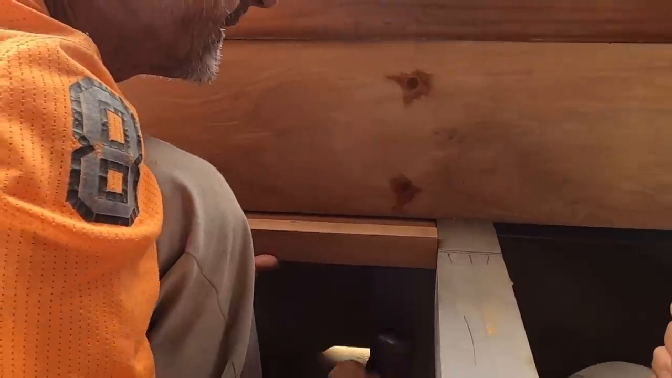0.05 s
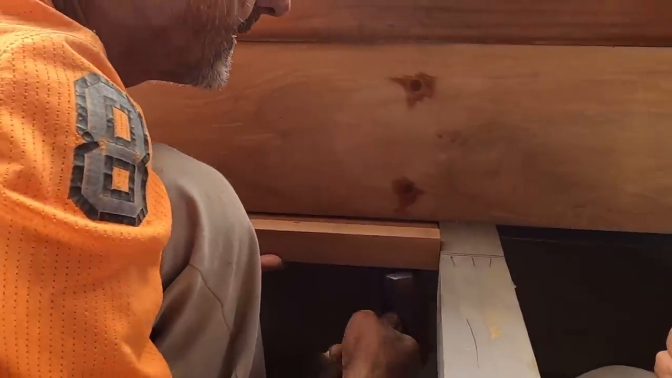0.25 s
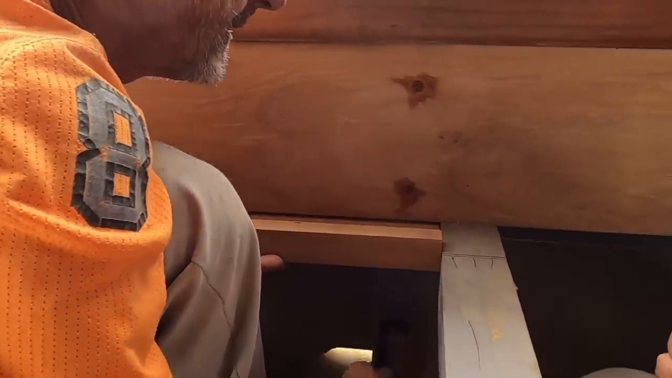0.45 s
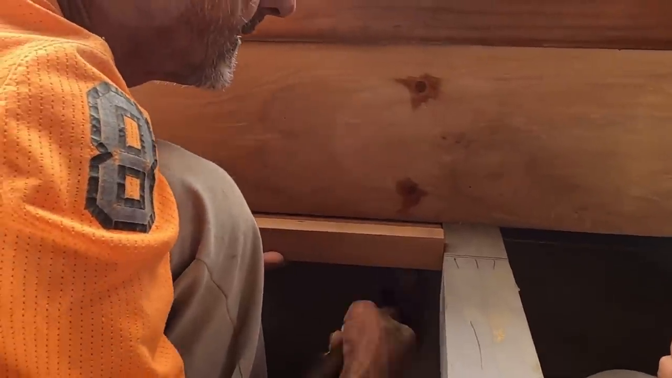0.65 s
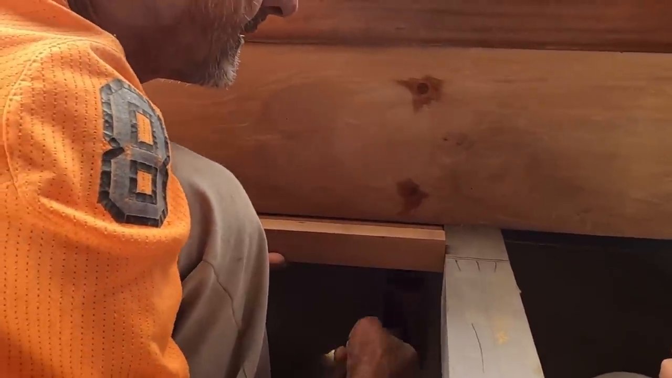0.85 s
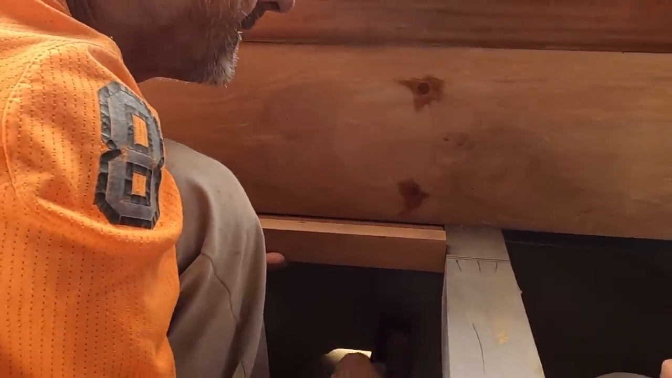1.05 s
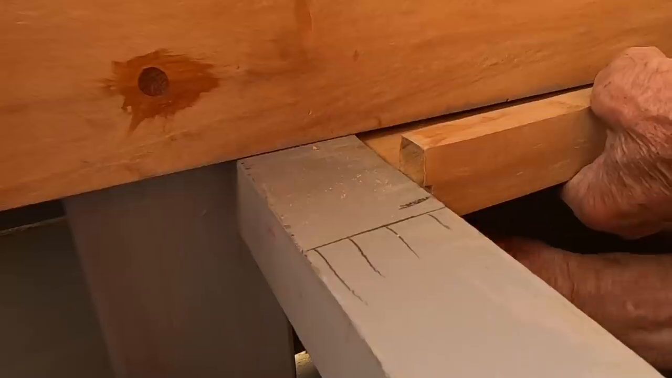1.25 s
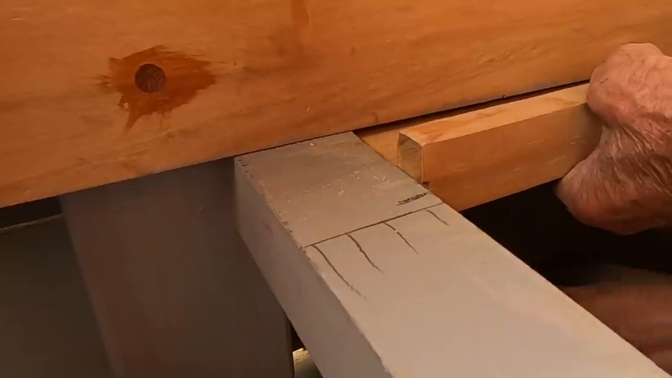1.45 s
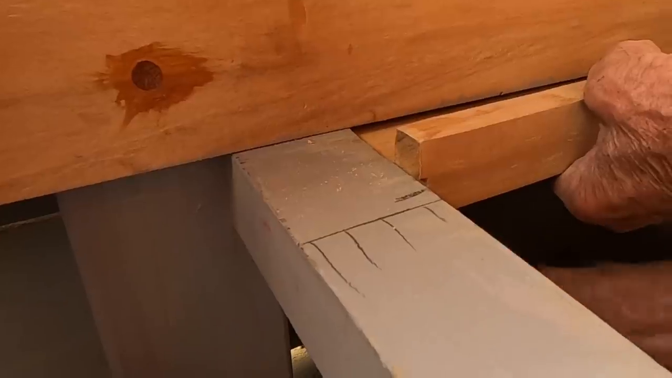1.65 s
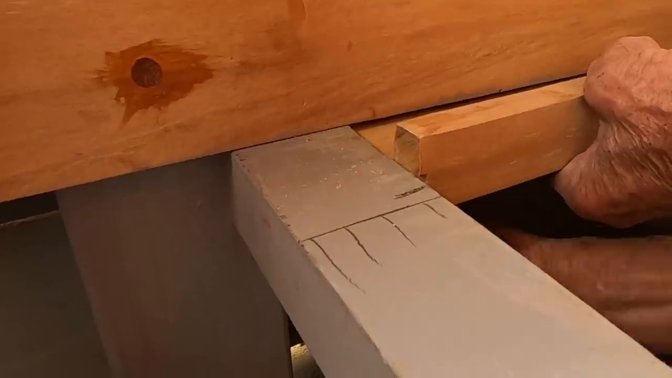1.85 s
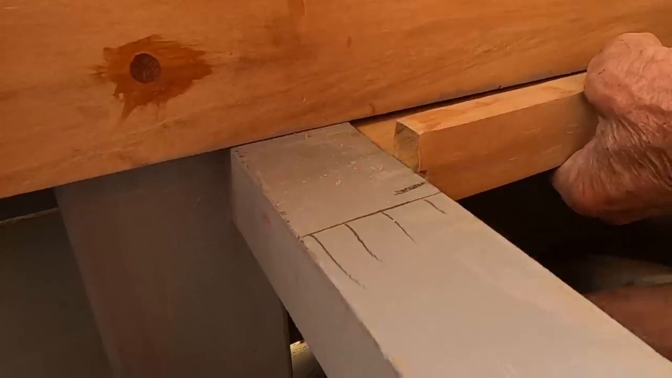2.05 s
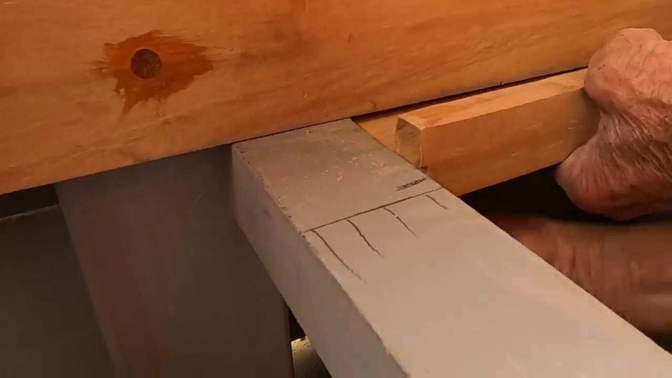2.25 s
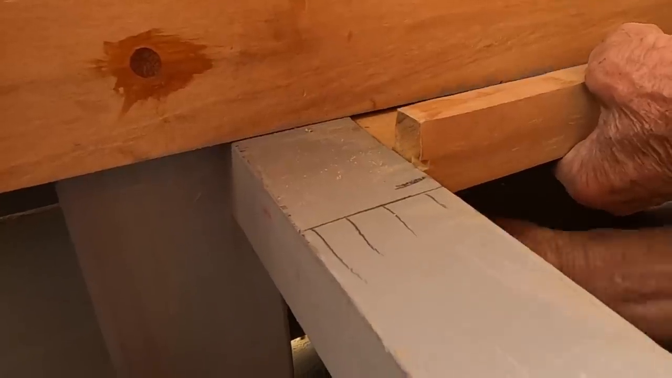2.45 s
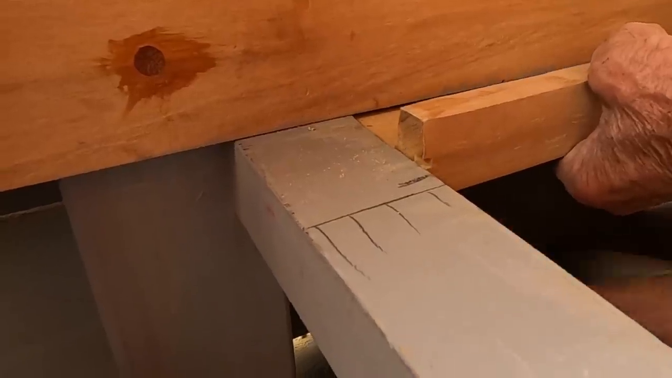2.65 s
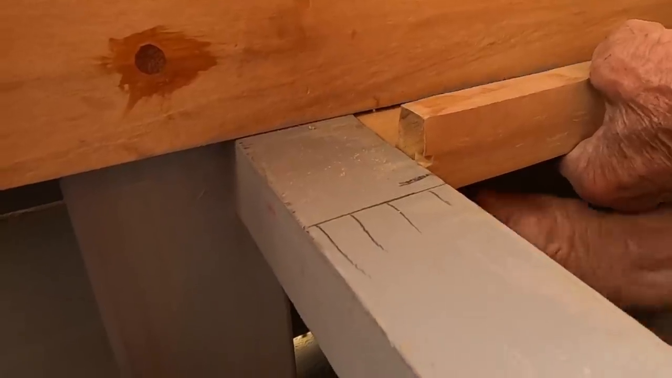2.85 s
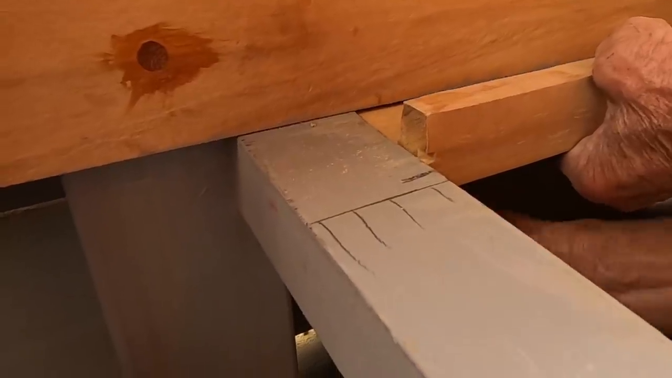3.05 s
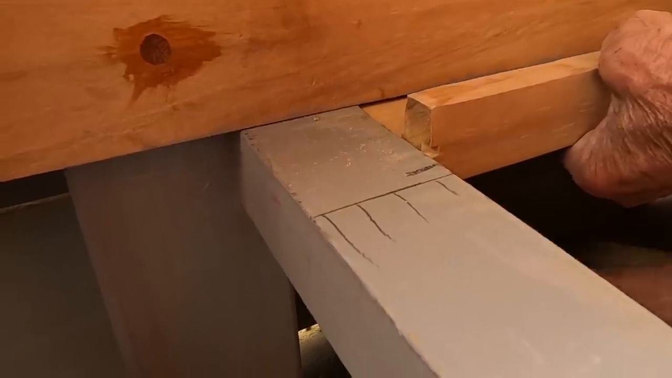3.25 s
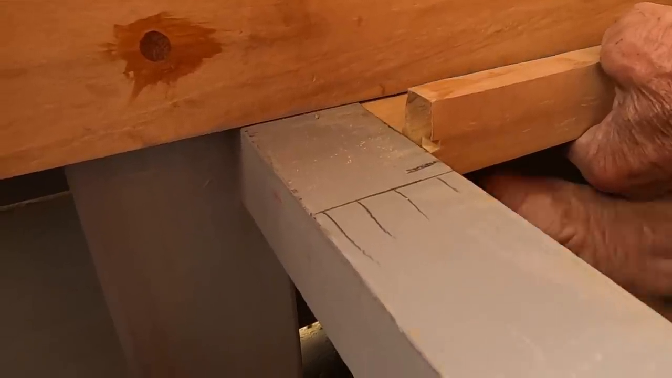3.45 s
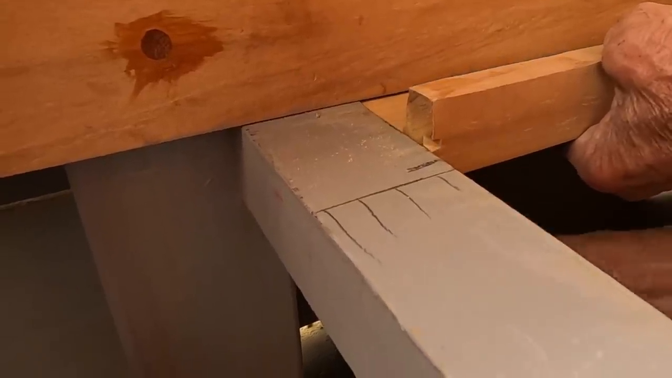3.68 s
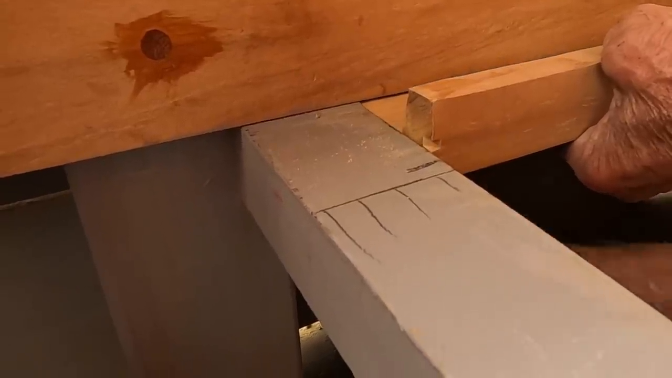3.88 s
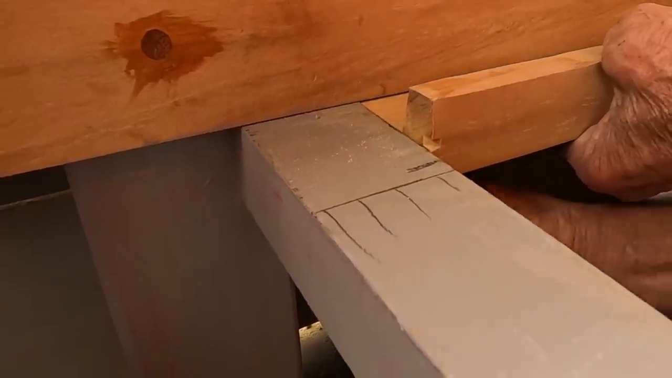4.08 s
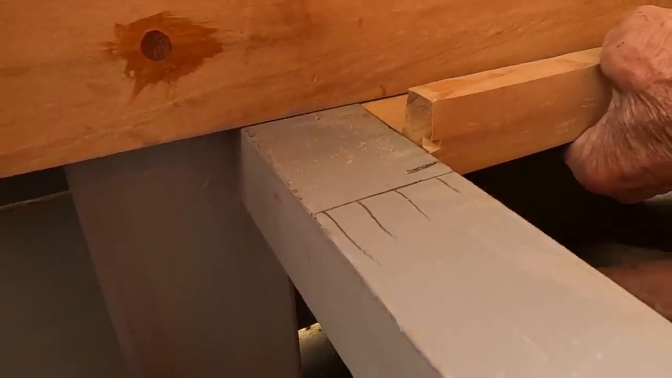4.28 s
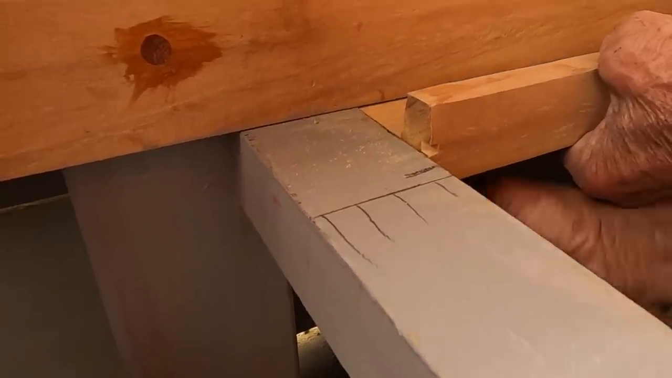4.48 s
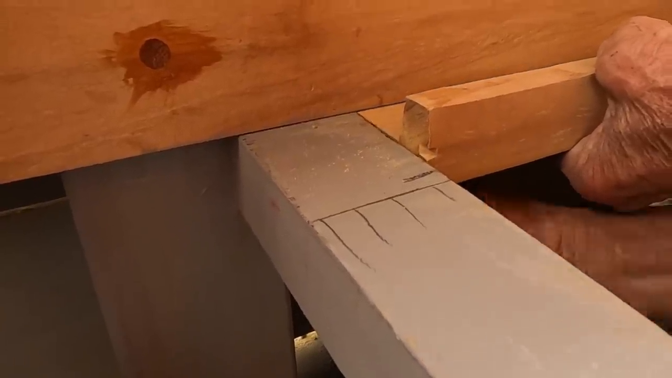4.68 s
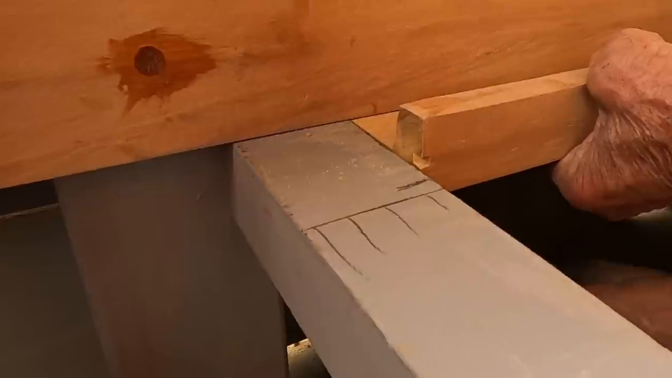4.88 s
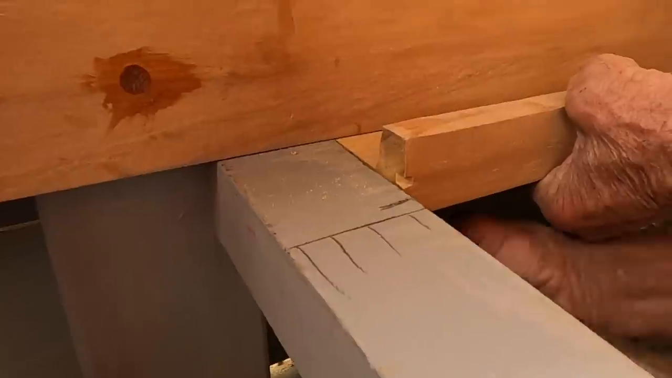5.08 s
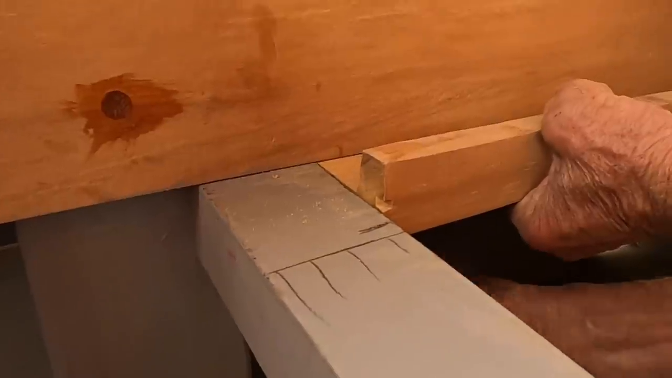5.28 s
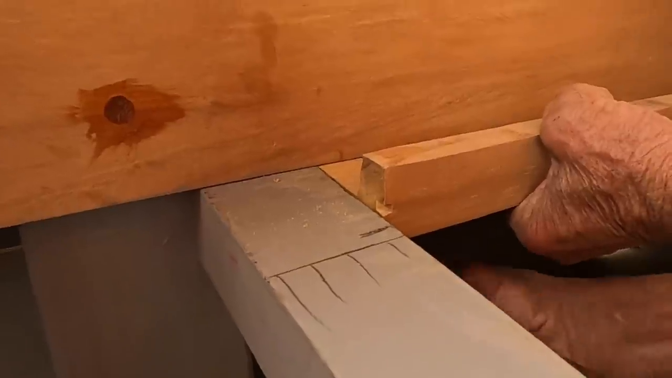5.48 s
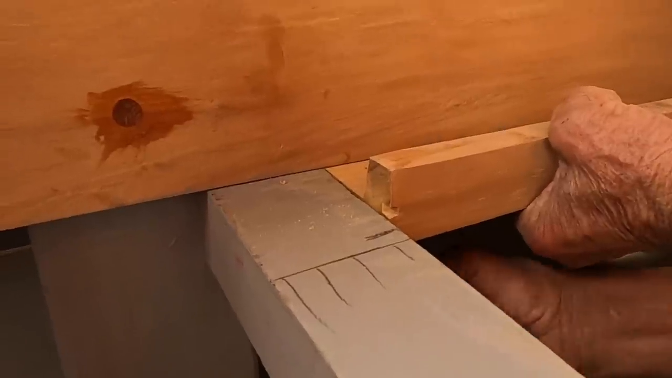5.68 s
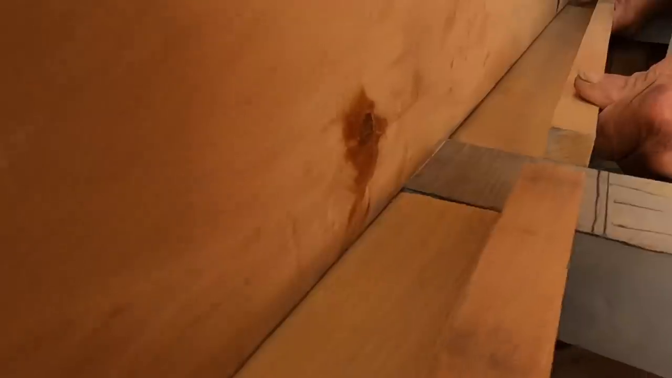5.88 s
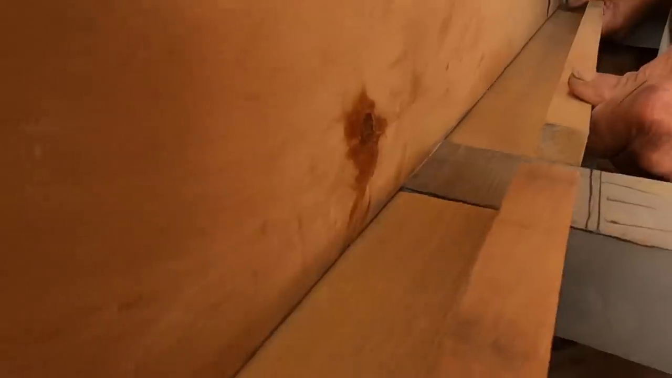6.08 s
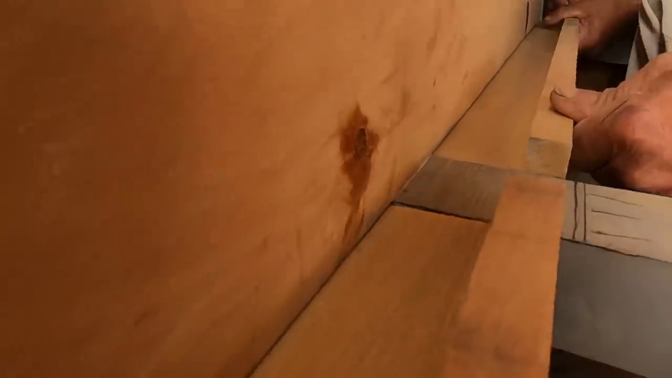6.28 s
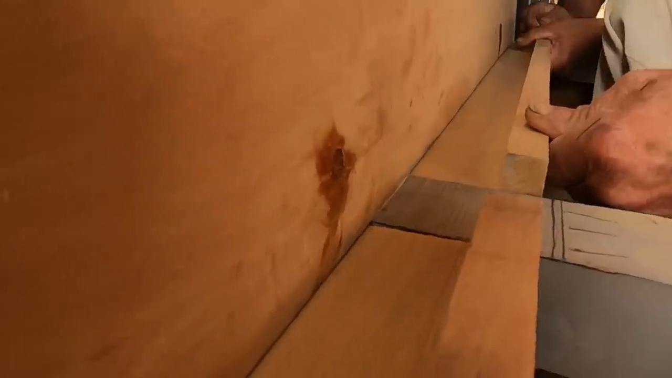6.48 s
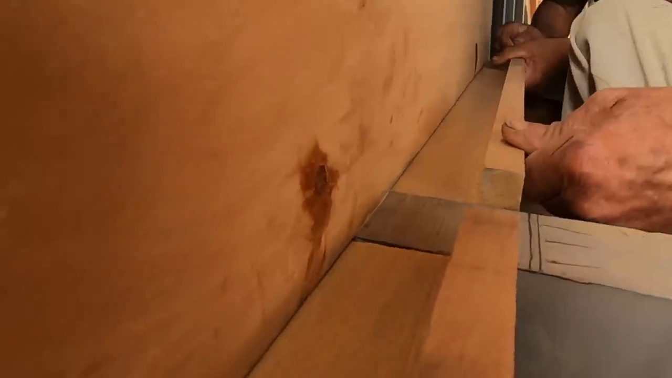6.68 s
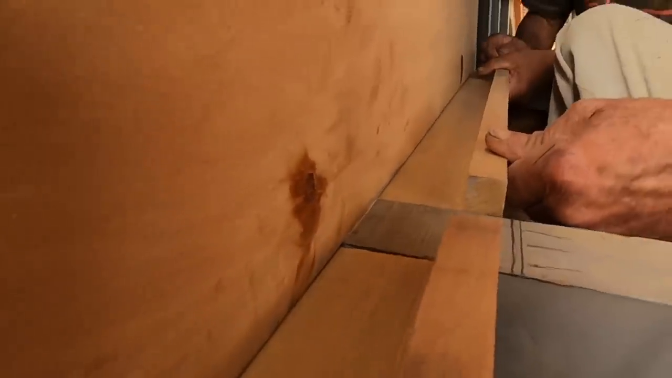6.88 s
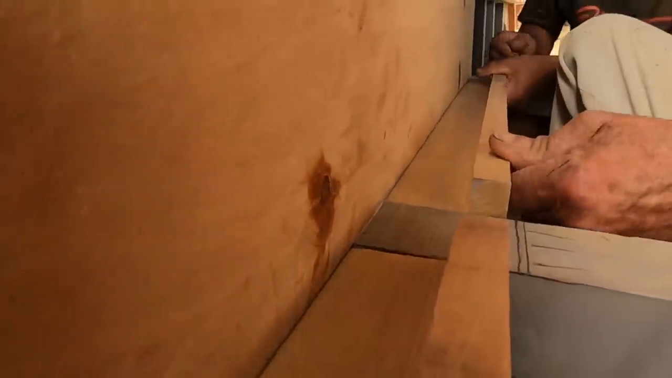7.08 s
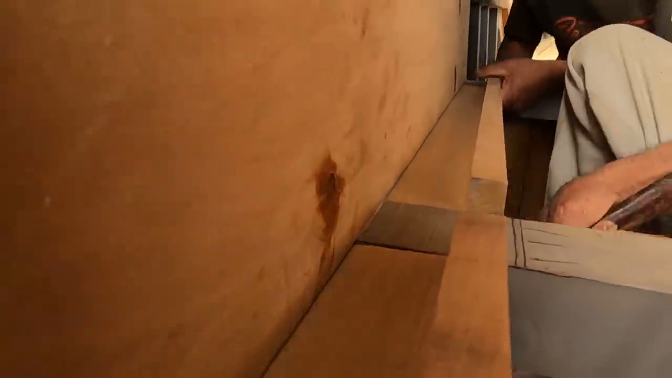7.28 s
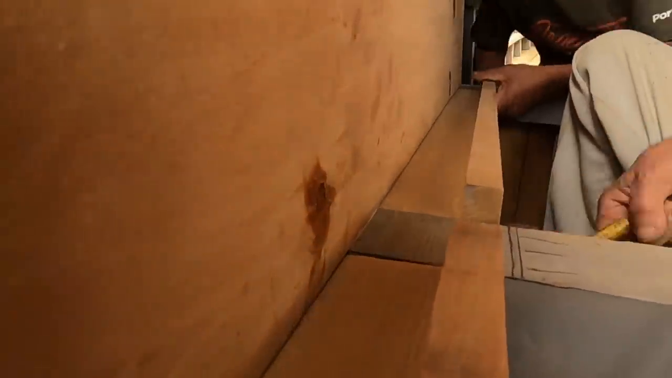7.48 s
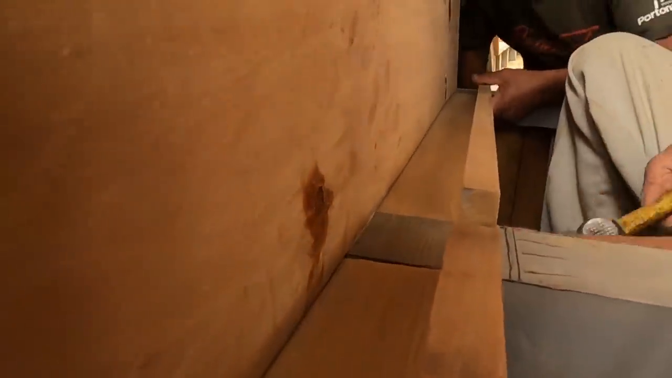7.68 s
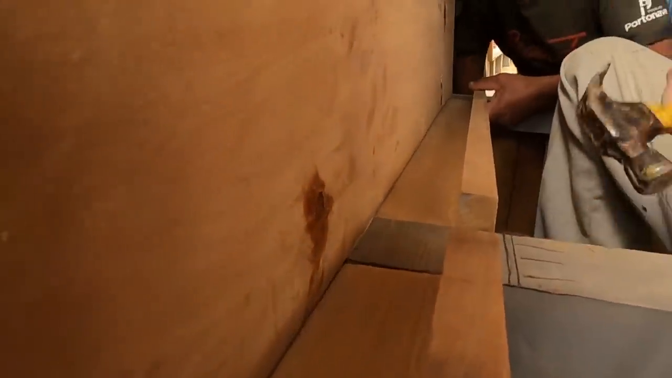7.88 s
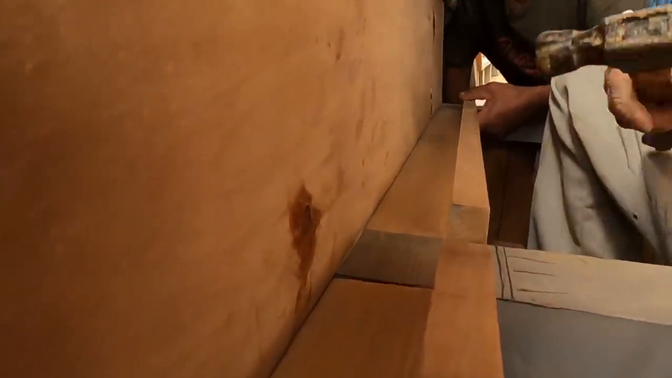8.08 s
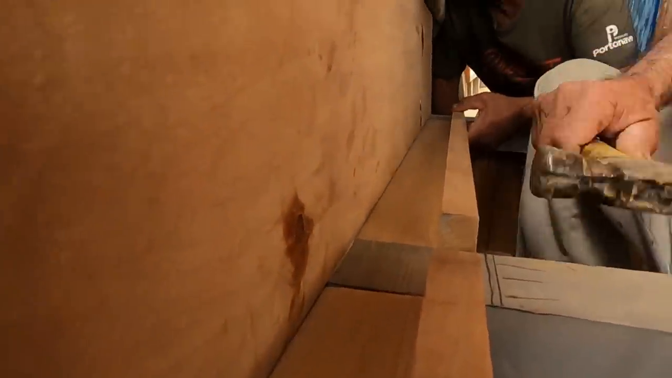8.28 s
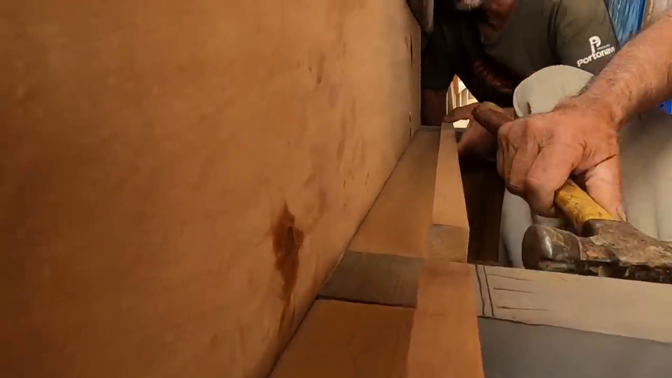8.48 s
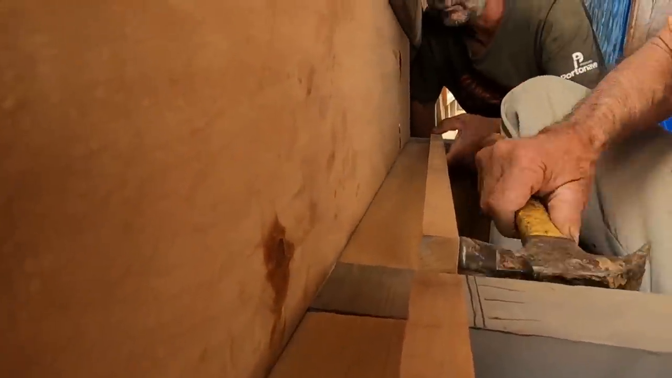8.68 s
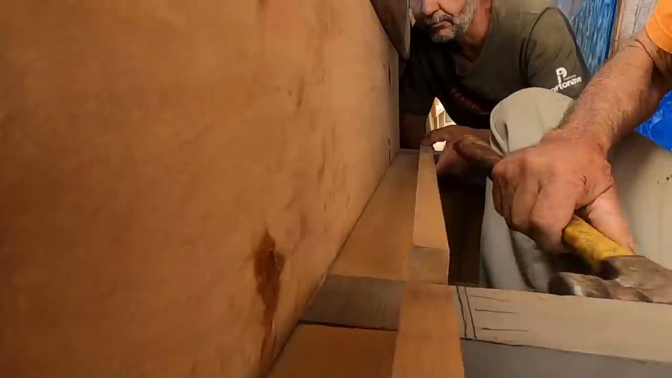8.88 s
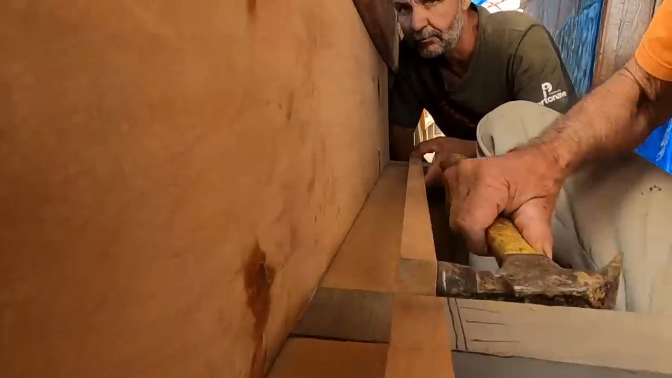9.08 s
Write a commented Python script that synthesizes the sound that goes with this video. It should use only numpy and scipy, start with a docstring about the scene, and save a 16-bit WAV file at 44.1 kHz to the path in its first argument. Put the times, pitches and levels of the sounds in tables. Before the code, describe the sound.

Close up in a boat workshop, a hammer strikes a wooden batten roughly every half second, each blow a sharp crack with a hollow knock and short hull boom. The first few are brighter with deep rumble after them; the next are duller and mono. Then come faint quickening taps, a near pause and one final soft knock over low rumble and hiss.

```python
"""In a boat workshop a claw hammer drives a batten home on the planking: eleven hard blows, then lighter taps.
Each contact is a crack of shaped noise at the steel face, a noise burst for the batten and sine modes for the hull;
a bright click, bounces of the head and small knocks fall between. Behind it lie filtered-noise rumble and hiss,
a thin sine whine, a squeak and a scuff.
It is heard close by from three places in turn, each with its own air and its own balance of the timber."""
import sys
import numpy as np
from scipy import signal
from scipy.fft import rfft, irfft, next_fast_len
from scipy.io import wavfile
from scipy.ndimage import uniform_filter1d, minimum_filter1d

SR = 44100
rng = np.random.default_rng(int(sys.argv[2]) if len(sys.argv) > 2 else 0)


def persist_wave(psi):
    """Save psi, clipped to +-1, as 16-bit WAV."""
    counts = np.round(np.clip(psi, -1, 1) * 32767).astype(np.int16)
    wavfile.write(sys.argv[1], SR, np.atleast_2d(counts).T)


N = 403065
TIME = np.arange(N) / SR  # s, along the whole scene
RING = 32768  # samples in one struck sound
AGE = np.arange(RING) / SR  # s since the start of a struck sound


def undb(db):
    """Decibels to gain."""
    return 10 ** (np.asarray(db) / 20)


def unit(x):
    """Scale to rms 1."""
    return x / np.sqrt(np.mean(x ** 2))


def read(table, hz):
    """Value of a (Hz, value) table on a log-frequency axis."""
    table_hz, value = np.transpose(table)
    return np.interp(np.log(hz + 1), np.log(table_hz), value)


def freqs(size):
    """Frequencies of a real spectrum."""
    return np.arange(size // 2 + 1) * SR / size


def colour(x, db):
    """Minimum-phase filter: the relative gain at each frequency is given and the energy stays the same."""
    size = x.shape[-1]
    # folding the cepstrum forward keeps the attack sharp
    cepstrum = irfft(np.log(undb(db)), size)
    cepstrum[1:size // 2] *= 2
    cepstrum[size // 2 + 1:] = 0
    filtered = irfft(rfft(x) * np.exp(rfft(cepstrum)), size)
    return unit(filtered) * np.sqrt(np.mean(x ** 2))


def pair(mid, side):
    """Left and right from mid and side."""
    return np.array([mid + side, mid - side])


def noise(size, side_db):
    """White stereo noise; the side level sets its width."""
    return pair(rng.standard_normal(size), undb(side_db) * rng.standard_normal(size))


def fade(t60, hold=0):
    """Exponential decay that starts gently, staying nearly level for about `hold` s."""
    held_age = np.hypot(AGE, hold) - abs(hold)
    return np.exp(-np.log(1000) * held_age / t60)


def add(out, s, sound):
    """Mix a sound in at time s."""
    start = max(int(s * SR), 0)
    out[:, start:start + sound.shape[-1]] += sound[:, :N - start]


def bump(hz, centre_hz, octaves, db):
    """A hump in dB around one frequency."""
    return db / (1 + (np.log2((hz + 1) / centre_hz) / octaves) ** 2)


def uneven(size, db, spacing_hz=110):
    """Random peaks and dips in dB across a spectrum."""
    return db * np.interp(freqs(size) / spacing_hz, np.arange(1024), rng.standard_normal(1024))


def walk(rate):
    """Smooth random wandering about zero, `rate` steps per second, spread about a third."""
    k = int(SR / rate)
    steps = np.repeat(rng.standard_normal(N // k + 1), k)
    return 0.4 * uniform_filter1d(steps, k)[:N]


# Moves to the second and third listening place, in seconds.
MOVES = (1.3, 5.927)


def places():
    """Shares of the first, second and third listening place over time, each crossfaded just before the move."""
    second, third = (np.clip((TIME - s) / fade_s + 1, 0, 1) for s, fade_s in zip(MOVES, (.1, .004)))
    return 1 - second, second - third, third


def air(spectrum, db, side_db, waver_db=2.0, ripple_db=2.37):
    """Workshop rumble and hiss as shaped noise; the bass is alike in both ears, the treble wider."""
    size = next_fast_len(N)
    f = freqs(size)
    shape = unit(undb(read(spectrum, f) + uneven(size, ripple_db)))
    width = undb(side_db) * (0.033 + f / (f + 4000))
    mid, side = (irfft(rfft(rng.standard_normal(size)) * gain, size)[:N] for gain in (shape, shape * width))
    return pair(mid, side) * undb(db + waver_db * walk(6.4))


def whine(hz=506.0, waver=0.0099):
    """A distant motor whines faintly: a wavering sine and its octave."""
    angle = 2 * np.pi * np.cumsum(hz * (1 + waver * walk(30))) / SR
    return undb(-61.0) * np.sin(angle) + undb(-62) * np.sin(2 * angle)


# Tone of the air at the third place. Each row: frequency in Hz, relative density in dB per Hz.
AIR_THIRD = [(25, -9.5), (55, -11), (84, 3.5), (115, -11.5), (200, -14.5), (260, -22), (410, -19),
             (550, -28), (950, -27.5), (1500, -36), (4000, -49), (5300, -47), (7500, -61.5), (15000, -97)]
# Swell of that air. Each row: time in seconds, level in dB before the air's own trim and waver.
THIRD_LEVEL = [(5.9, -46.5), (6.6, -44), (7.35, -48), (7.7, -42.5), (8.3, -40), (8.7, -35), (8.95, -47),
               (9.14, -40)]
SWELL_TOP_HZ = 900  # the air swells mostly below this
HISS_DB, HISS_SWELL_SHARE = -45.5, 0.76  # pivot level of the hiss, and how far it follows the swell


def swelling_air():
    """At the third place the rumble swells and sinks; the hiss above it follows only in part."""
    rumble_db = np.interp(TIME, *np.transpose(THIRD_LEVEL))
    hiss_db = HISS_DB + HISS_SWELL_SHARE * (rumble_db - HISS_DB)
    whole = air(AIR_THIRD, db=-0.5, side_db=4.0, waver_db=3.5)
    low_pass = signal.butter(2, SWELL_TOP_HZ, fs=SR, output="sos")
    rumble = signal.sosfiltfilt(low_pass, whole)
    hiss = whole - rumble
    return rumble * undb(rumble_db) + hiss * undb(hiss_db)


# Tone of the air at the first and second place. Each row: frequency in Hz, relative density in dB per Hz.
AIR_FIRST = [(25, -2), (95, -2), (140, -14.5), (195, -8.5), (380, -22.5), (700, -31.5), (1100, -25),
             (2400, -25), (5800, -30), (7700, -33), (9000, -49.5), (12500, -58), (15000, -69)]
AIR_SECOND = [(25, -5), (55, 4), (110, 1), (195, -5), (330, -14.5), (520, -18.5), (750, -25.5), (1020, -21),
              (2500, -19), (4200, -25), (6000, -31.5), (7700, -33), (10000, -41.5), (15000, -42.5)]


def workshop():
    """Background bed: each listening place has its own air, and the second also has the motor."""
    first, second, third = places()
    first_air = air(AIR_FIRST, db=-41, side_db=4)
    second_air = air(AIR_SECOND, db=-41.5, side_db=-26.5) + whine()
    return first_air * first + second_air * second + swelling_air() * third


def squeak(s=8.2, length=0.12, hz=620., glide=0.015, db=-45):
    """A faint, short, slightly rising squeak: one gliding sine."""
    out = np.zeros((2, N))
    part = np.minimum(AGE / length, 1)
    angle = 2 * np.pi * np.cumsum(hz * (1 + glide * (2 * part - 1))) / SR
    add(out, s, undb(db) * np.sin(np.pi * part) * np.sin(angle)[None])
    return out


def rub(s, length, hz, width_hz, db):
    """A soft swell of friction: noise in one resonance."""
    out = np.zeros((2, N))
    shape = -20 * np.log10(1 + ((freqs(RING) - hz) / width_hz) ** 2)
    swell = np.sin(np.pi * np.minimum(AGE / length, 1))
    add(out, s, undb(db) * colour(noise(RING, side_db=-7.5), shape) * swell)
    return out


# Sharp resonances of batten and hammer head. Each row: centre in Hz, width in Hz, lift in dB.
RINGS = [(1083, 23, 6.5), (1542, 47, 2.5), (1880, 19, 5), (2490, 140, 3.5), (2635, 45, 3), (3230, 41, 2),
         (3300, 70, 0.5), (3950, 110, 2.5), (4780, 66, -3), (4900, 94, 2.5), (5900, 22, 1)]


def rings(hz):
    """Lift or dip in dB from the sharp resonances."""
    return sum(db / (1 + (2 * (hz - centre) / width) ** 2) for centre, width, db in RINGS)


# Tone of the rush before a blow. Each row: frequency in Hz, relative level in dB.
RUSH_COLOUR = [(100, -16.5), (600, 1), (2200, 1), (4000, 1), (5500, -6), (7500, -10.5), (10000, -33.5),
               (15000, -54)]
RUSH_DB, RUSH_RISE_S = -5, 0.0084  # level against the blow's crack level, rise time constant


def rushes(blows, size=2048, ripple_db=4.5):
    """A few hundredths of a second of gritty hiss swell up to each blow, each with its own uneven colour."""
    out = np.zeros((2, N))
    f = freqs(size)
    rise = np.exp(-AGE[:size][::-1] / RUSH_RISE_S)
    for s, _, _, crack_db, *_ in blows:
        tone = read(RUSH_COLOUR, f) + rings(f) + uneven(size, ripple_db)
        hiss = colour(noise(size, side_db=-25.5), tone)
        add(out, s - size / SR, undb(crack_db + RUSH_DB) * hiss * rise)
    return out


def shudder(strikes, hz=50, db=-29, t60=0.67):
    """A deep rumble follows each strike: decaying noise humped around a low pitch."""
    out = np.zeros((2, N))
    shape = bump(freqs(RING), hz, octaves=2.0, db=66.5)
    envelope = fade(t60) * (1 - np.exp(-AGE / .005))
    for s, *_ in strikes:
        add(out, s, undb(db) * colour(noise(RING, side_db=-17.5), shape) * envelope)
    return out


# Ring of the dense wood and the workshop. Each row: frequency in Hz, decay time t60 in seconds.
TAIL = [(60, 0.81), (200, 0.35), (600, 0.48), (1500, 0.21), (4000, 0.27), (7000, 0.2), (12000, .18)]


def tail(x, hold):
    """Let each octave of a noise die away at its own rate."""
    spectrum = rfft(x)
    octave = np.log2(np.clip(freqs(RING), 62.5, 16000) / 62.5)
    out = 0
    for k in range(9):
        band = irfft(spectrum * np.maximum(1 - abs(octave - k), 0))  # triangular, overlapping bands
        out = out + band * fade(read(TAIL, 62.5 * 2.0 ** k), hold)
    return out


# Modes of hull and batten. Each row: pitch in Hz before detuning, relative level in dB,
# decay time t60 in seconds before the strike's hold scales it.
HULL = [(35.3, -12.5, 0.65), (67, -12.5, 1), (89.1, -6.5, 0.86), (105, 2.5, 0.59), (121.2, 0, 0.36),
        (132.3, -5, 0.52), (145.9, 2, 0.35), (174.3, -2.5, 0.46), (180.1, -4.5, 0.52), (194.8, 1.5, 0.37),
        (202.1, -2, 0.57), (218.2, -6, 0.49), (243.3, -1.5, 0.35), (264.7, 2.5, 0.27), (276, 3, .34),
        (293.8, 1.5, 0.33), (348, 0, 0.2), (376.4, -1.5, .26), (410, -9, 0.47), (469, -10.5, .28),
        (516, -8.5, 0.24), (548.4, -11, 0.24), (678, -16, 0.11)]


def hull(phase, thump_db, boom_db, boom_hz, bark_db, knock_hz, hold, scatter_db=1.5, detune=.008, rise_s=.002):
    """Frames, hull skin and planks ring as three groups of sine modes; the spot struck shifts their balance."""
    hz, db, t60 = np.transpose(HULL)
    t60 = t60 * min(0.91 + 3.1 * abs(hold), 1.2)  # a light tap stays in the batten, where the hand damps it
    level_chance, pitch_chance, phase_chance = rng.standard_normal((3, len(hz)))
    favoured = bump(hz, boom_hz, octaves=0.32, db=6.0) + bump(hz, knock_hz, octaves=0.14, db=8.0)
    size = undb(db + favoured + scatter_db * level_chance)
    group = np.searchsorted([160, 320], hz)  # thump, boom and bark, split at these Hz
    group_rms = np.sqrt(np.bincount(group, size ** 2 / 2))
    size *= undb([thump_db, boom_db, bark_db])[group] / group_rms[group]
    start_phase = phase + .9 * phase_chance
    angle = 2 * np.pi * np.outer(hz * (1 + detune * pitch_chance), AGE) + start_phase[:, None]
    return size @ (np.sin(angle) * fade(t60[:, None], hold)) * (1 - np.exp(-AGE / rise_s))


# Tone of the batten's crowded modes. Each row: frequency in Hz, relative level in dB.
KNOCK = [(40, -14.5), (150, -13), (350, -3.5), (560, 3.5), (780, 0.5), (1050, 1), (1400, -1.5),
         (1950, -8.5), (3200, -27.5), (8000, -66.5)]


def knock(grain, knock_hz, hold, spike=8.0, tail_db=-12, t60=.05, reach=2.2):
    """The batten's crowded modes: a short hollow burst that leaks into hull and room; a deeper knock is duller."""
    f = freqs(RING)
    favoured = bump(f, knock_hz, octaves=0.47, db=5)
    dulling = -10 * np.log10(1 + (f / (reach * knock_hz)) ** 4)
    burst = grain * fade(t60) + undb(tail_db) * tail(grain, 0.5 * hold)
    burst[:, 0] += spike
    return colour(burst, read(KNOCK, f) + favoured + dulling + rings(f))


# Tone of steel cracking on wood. Each row: frequency in Hz, relative level in dB.
CRACK = [(200, -19), (900, -10), (1500, 3.5), (2000, 1), (2600, -1), (3900, -3), (5200, -4), (7000, -7),
         (9500, -11), (15000, -12)]


def crack(grain, edge_hz, tail_db, hold, spike=9.9, t60=0.032, ring_share=0.38):
    """Steel meets wood: a spike and a brief burst of crushing fibres; a softer contact has less treble."""
    f = freqs(RING)
    softness = -10 * np.log10(1 + (f / edge_hz) ** 6.2)
    # extra resonance in the tail lets the rings outlast the rest
    after = colour(tail(grain + noise(RING, side_db=-2.5), hold), ring_share * rings(f))
    burst = grain * fade(t60) + undb(tail_db) * after
    burst[:, 0] += spike
    return colour(burst, read(CRACK, f) + rings(f) + softness)


# How the timber sounds from each place. Each row: low thump against boom in dB, thump change in dB per octave
# of boom pitch, plank bark against boom in dB before seating, level start of the ring in seconds for a 0 dB crack,
# tail level of the crack in dB, level start of that tail in seconds.
VANTAGES = [(-5.5, -0.5, -11, 0.03, -21, .005), (-4.5, -1, -11.5, 0.0536, -19, 0.0034),
            (-8.5, -19.5, -9.5, 0.0359, -23.5, 0.048)]


def vantage(s):
    """The listening place in use at time s."""
    return VANTAGES[np.searchsorted(MOVES, s)]


# Hammer blows and, at 1.287 s, a bright click. Each row: start in seconds, batten knock level in dB,
# hull boom level in dB, face crack level in dB, favoured boom pitch in Hz, favoured knock pitch in Hz,
# treble edge of the contact in Hz.
STRIKES = [ (0.2625, -10.5, -12.5, -15, 187, 1630, 5940), (0.755, -12, -16, -13, 184, 1150, 7250),
           (1.2622, -11, -15, -9.5, 172, 1090, 6900), (1.287, -19.5, -15, -18.5, 256, 1080, 14000),
           (1.838, -9, -12, -13, 211, 586, 3820), (2.413, -11.5, -12.5, -8.5, 180, 580, 5140),
           (2.9868, -9.5, -10, -8, 240, 556, 4120), (3.546, -9, -11.5, -10, 262, 560, 4030),
           (4.086, -10.5, -10.5, -9.5, 245, 840, 4740), (4.637, -10.5, -14.5, -10, 185, 795, 6700),
           (5.1942, -11.5, -13, -14.5, 258, 670, 4920), (5.6841, -13.5, -13, -15.5, 275, 724, 3930),
           (6.1573, -25, -31, -22.5, 147, 1085, 4740), (6.4909, -25, -28, -22.5, 267, 1050, 5440),
           (6.753, -22, -25.5, -23.5, 276, 565, 6060), (6.958, -21, -23.5, -36, 280, 796, 5960),
           (7.1442, -19.5, -25, -34.5, 275, 602, 5520), (8.7516, -23, -20.5, -33.5, 279, 877, 7260), ]
# Soft contacts: bounces of the head and a few small separate knocks. Each row: start in seconds,
# hull boom level in dB, batten knock level in dB, favoured knock pitch in Hz.
SOFT_CONTACTS = [(2.067, -43, -45, 550), (2.247, -34.5, -38.5, 550), (4.7159, -19, -23.5, 680),
                 (5.27, -14, -16, 700), (6.041, -36.5, -44, 2000), (6.8, -36, -35, 1200),
                 (7.009, -30.5, -41, 1560), (7.205, -30.5, -36, 1580)]
SOFT_BOOM_HZ, SOFT_EDGE_HZ, SOFT_HOLD_S = 254.3, 2700, 0.0056
SOFT_CRACK_DB, SOFT_BARK_DB = -13.5, -1.5  # crack against the soft contact's knock, bark against its boom
# The batten seats against the planking, which shifts the bark. Each row: time in seconds, bark change in dB.
SEATING = [(3.5, -2), (4.1, 6.5), (4.65, 13), (5.7, 9.5), (5.95, 1)]
BOOM_HZ = 225  # middle pitch of the hull's boom
HOLD_POWER = 0.36  # a louder crack goes with a longer level start of the ring
UNEVEN_DB = 2  # depth of the random peaks and dips in the timber's response


def hammering():
    """All strikes and soft contacts sound the same timber, so they share much of their grain."""
    out = np.zeros((2, N))
    phase = rng.uniform(0, 2 * np.pi, len(HULL))
    timber = rng.standard_normal((2, RING))

    def strike(s, knock_db, boom_db, crack_db, boom_hz, knock_hz, edge_hz, bark_db, hold):
        """One contact: the hull booms, the batten knocks, the steel face cracks; each has its own colour."""
        thump_db, thump_db_per_octave, _, _, room_db, room_hold = vantage(s)
        thump_db = thump_db + thump_db_per_octave * np.log2(boom_hz / BOOM_HZ)
        batten, face = (unit(1.1 * own + noise(RING, side_db=-3)) for own in timber)
        boom = hull(phase, boom_db + thump_db, boom_db, boom_hz, boom_db + bark_db, knock_hz, hold)
        contact = undb(knock_db) * knock(batten, knock_hz, hold)
        contact = contact + undb(crack_db) * crack(face, edge_hz, room_db, room_hold)
        add(out, s, boom + colour(contact, uneven(RING, UNEVEN_DB)))

    for s, knock_db, boom_db, crack_db, boom_hz, knock_hz, edge_hz in STRIKES:
        _, _, bark_db, hold, *_ = vantage(s)
        bark_db = bark_db + np.interp(s, *np.transpose(SEATING))
        hold = hold * undb(crack_db) ** HOLD_POWER
        strike(s, knock_db, boom_db, crack_db, boom_hz, knock_hz, edge_hz, bark_db, hold)
    for s, boom_db, knock_db, knock_hz in SOFT_CONTACTS:
        strike(s, knock_db, boom_db, knock_db + SOFT_CRACK_DB, SOFT_BOOM_HZ, knock_hz,
               SOFT_EDGE_HZ, SOFT_BARK_DB, SOFT_HOLD_S)
    return out


def scene():
    """Hammering over the workshop air, with rumble at the first place, rushes, a faint squeak and a last scuff."""
    scuff = rub(9.0, length=0.11, hz=1293, width_hz=870, db=-57.5)
    first = [row for row in STRIKES if row[0] < MOVES[0]]
    second = [row for row in STRIKES if MOVES[0] < row[0] < MOVES[1]]
    return workshop() + squeak() + scuff + rushes(second) + shudder(first) + hammering()


def ports(x, lag_s=3e-5, dull_hz=7540.0):
    """Sound reaches the left port a little late; the second place is heard in mono and duller."""
    size = next_fast_len(N + 64)
    delay = np.exp(-2j * np.pi * freqs(size) * lag_s)
    late = irfft(rfft(x[0], size) * delay, size)[:N]
    low_pass = signal.butter(2, min(dull_hz, SR / 3), fs=SR, output="sos")
    dull = signal.sosfilt(low_pass, x.mean(axis=0))
    mono = places()[1]
    return mono * dull + (1 - mono) * np.array([late, x[1]])


def record(dry):
    """Two close ports, a fast limiter aimed below full scale, and a steep cut of the top."""
    x = ports(dry)
    gain = np.minimum(1, .95 / (np.abs(x).max(axis=0) + 1e-9))
    gain = uniform_filter1d(minimum_filter1d(gain, size=61), size=61)  # sizes in samples
    top_cut = signal.ellip(8, .2, 70, 15800, fs=SR, output="sos")  # order, ripple dB, stop dB, edge Hz
    return signal.sosfilt(top_cut, x * gain)


dry = scene()
out = record(dry)
persist_wave(out)
```